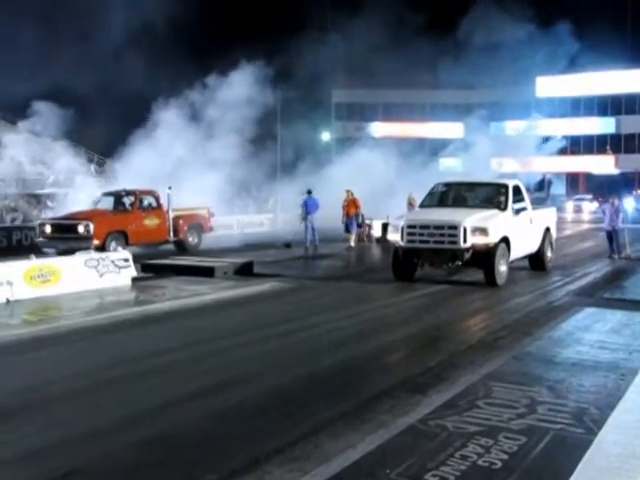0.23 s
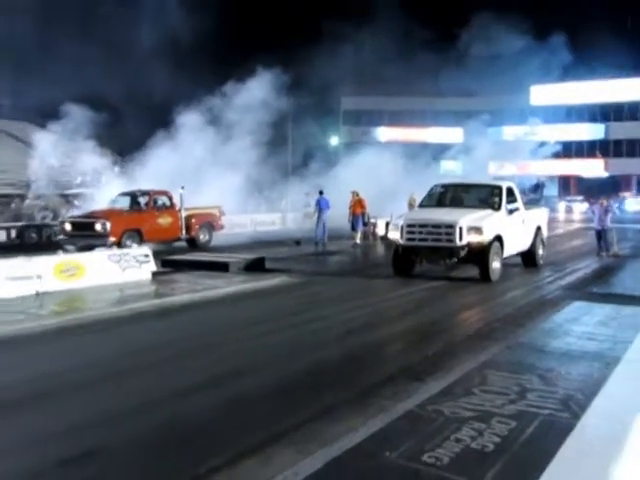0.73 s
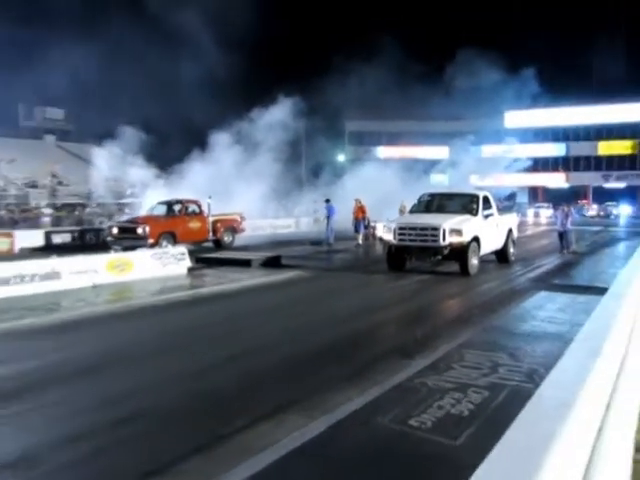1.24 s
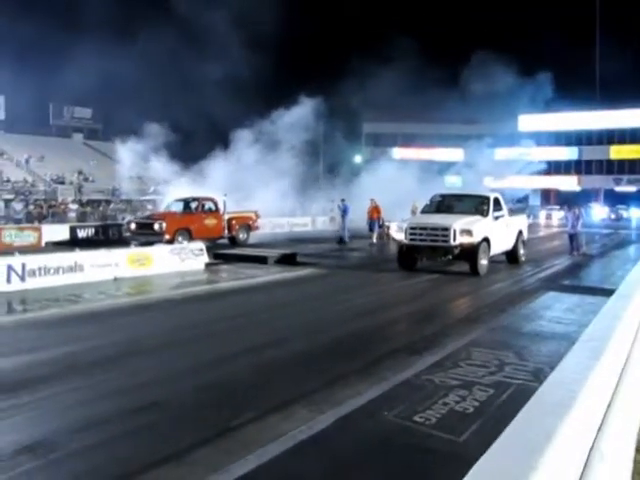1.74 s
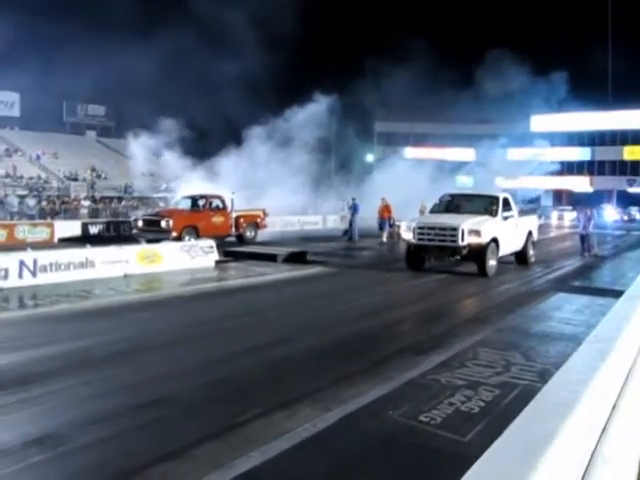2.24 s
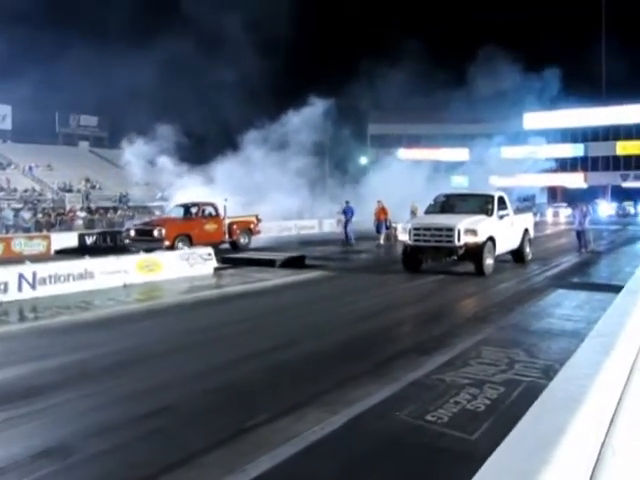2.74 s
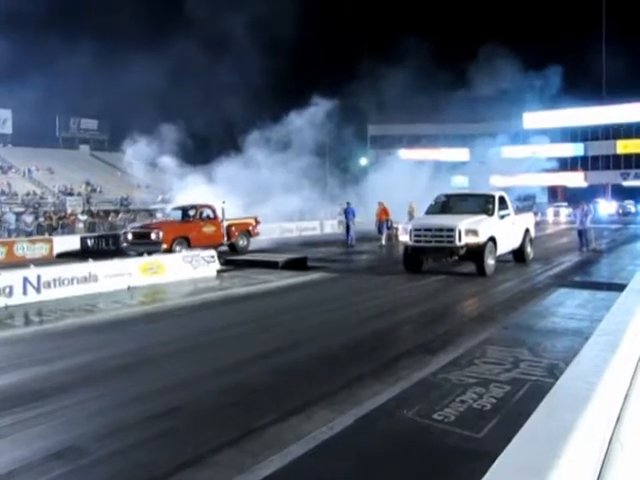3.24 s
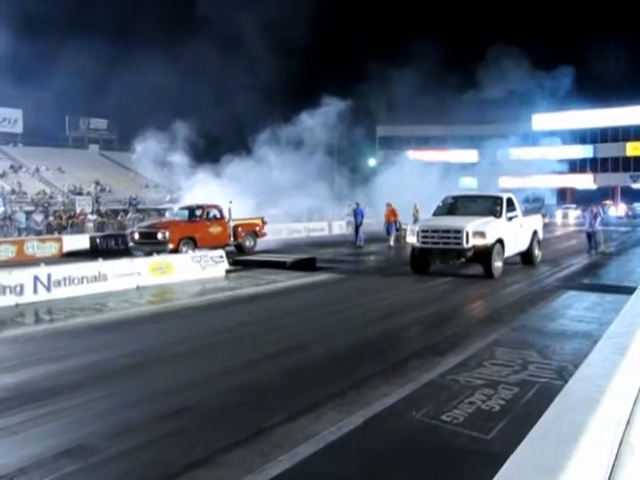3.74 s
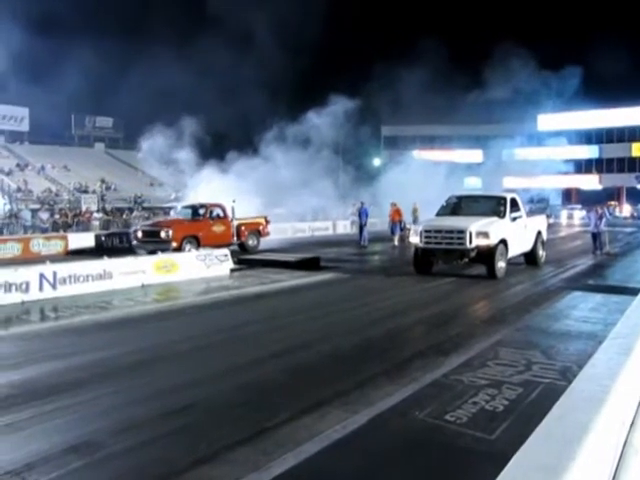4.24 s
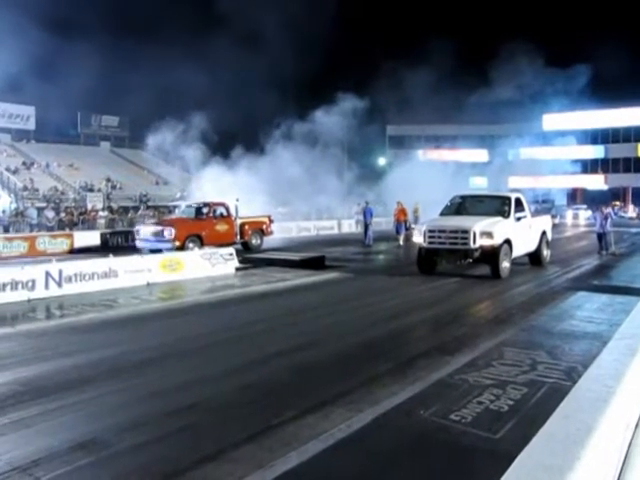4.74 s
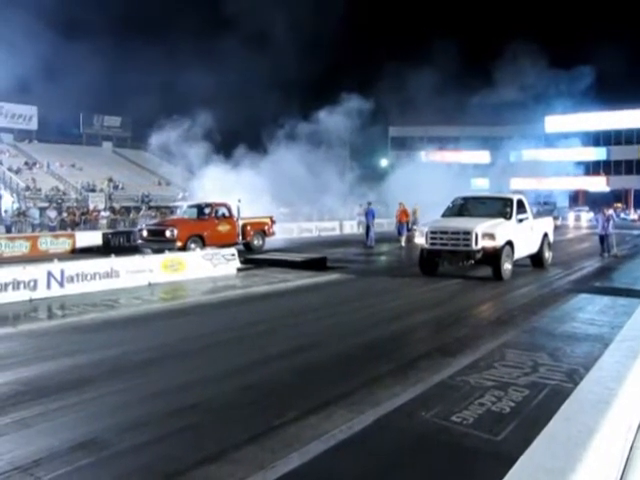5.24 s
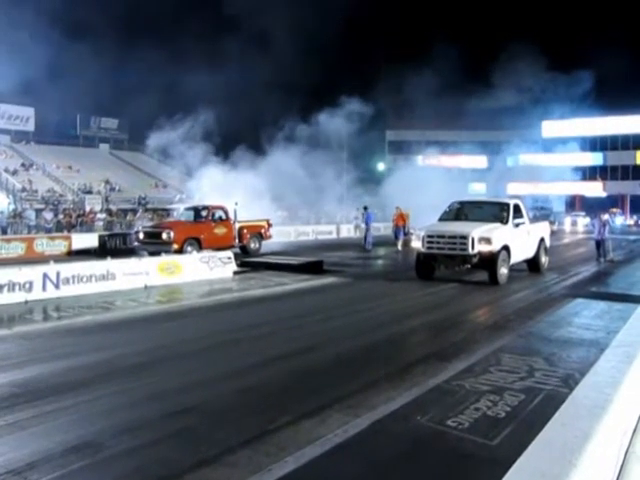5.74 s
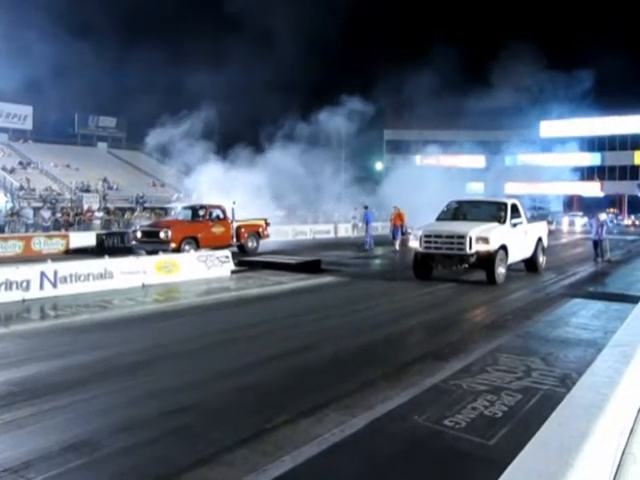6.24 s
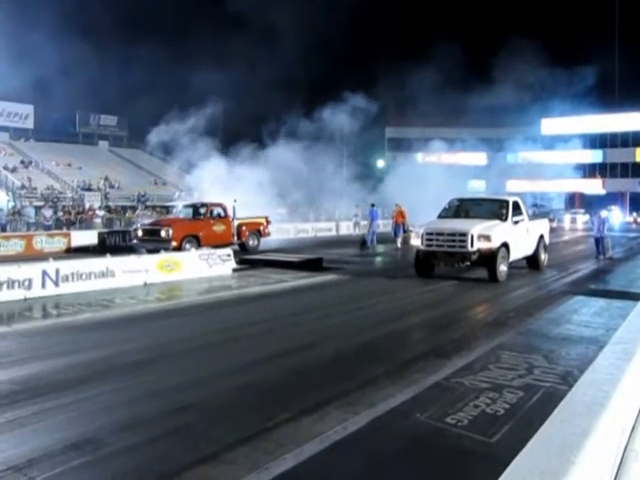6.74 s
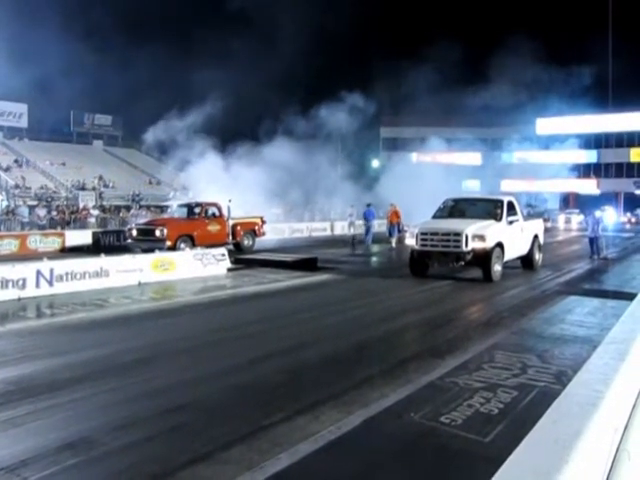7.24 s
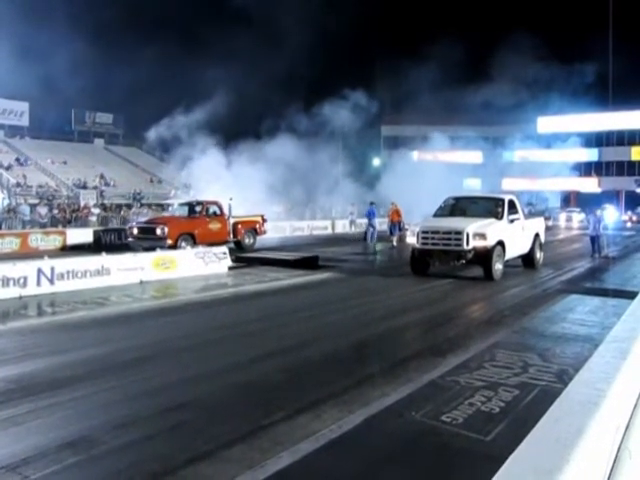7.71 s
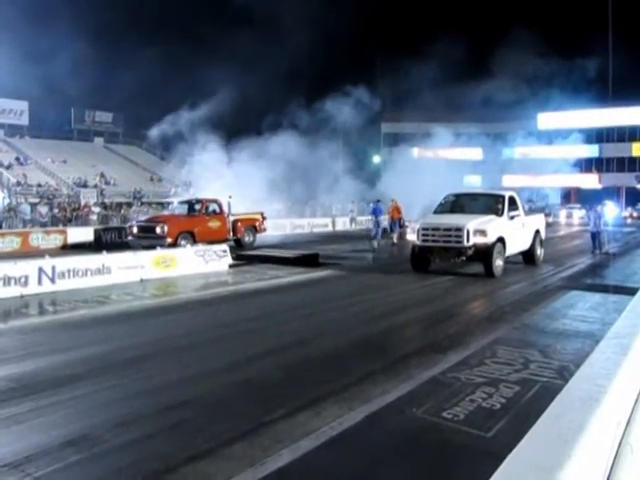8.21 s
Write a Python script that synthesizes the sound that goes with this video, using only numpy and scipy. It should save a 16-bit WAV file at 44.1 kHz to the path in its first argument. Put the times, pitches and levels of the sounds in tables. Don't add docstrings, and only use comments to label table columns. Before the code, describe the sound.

A diesel pickup idles with clattering knock and a brief brake squeal, then revs hard, exhaust droning and turbos whistling upward to the end.

```python
import sys
import numpy as np
from scipy import signal
from scipy.fft import rfft, irfft
from scipy.io import wavfile
from scipy.ndimage import uniform_filter1d

SR = 44100
rng = np.random.default_rng(int(sys.argv[2]) if len(sys.argv) > 2 else 0)


def store_wav(level_fs):
    pcm = np.round(np.clip(np.atleast_2d(level_fs), -1, 1) * 32767)
    wavfile.write(sys.argv[1], SR, pcm.T.astype(np.int16))


def field_ratio(decibels):
    return 10 ** (np.asarray(decibels, dtype=float) / 20)


N = 373527

# f/Hz, level/dB
ECHO_COLOUR = [(60, -24), (300, -24), (700, -18), (1500, -10), (3000, -7), (5000, -1), (8000, -2),
               (14000, -2)]
# f/Hz, level difference/dB
LEFT_COLOUR = [(60, 0.5), (700, 0.5), (1280, 0), (2370, -4), (4370, 2), (8070, -3.5), (14900, -2)]
# f/Hz, level/dB per Hz
RUMBLE_COLOUR = [(25, -18), (45, 3.5), (75, 12.5), (107, 13), (150, 10), (200, 9.5), (300, 4), (450, 6),
                 (700, -37)]
# t/s, f/Hz
SQUEAL_PITCH = [
    (.58, 1335),
    (.7, 1348),
    (.9, 1312),
    (1.2, 1300),
    (1.29, 1262),
    (1.45, 1265),
    (1.67, 1308),
]
# f/Hz, level/dB per Hz
HISS_COLOUR = [(1760, -11.5), (3000, -2), (4400, -11), (4940, -16.5), (5390, -10), (6000, -9.5),
               (7200, -10), (8690, -18.5), (10000, -20.5), (10800, -66), (15000, -97)]
# t/s, f/Hz
TURBO_SPEED = [
    (5.9, 2350),
    (6.3, 2700),
    (6.6, 3120),
    (6.95, 3640),
    (7.3, 4160),
    (7.7, 4640),
    (8.0, 4942),
    (8.24, 5140),
    (8.47, 5270),
]
# multiple of the engine cycle, level/dB
EXHAUST_TONES = [(5, -31), (6, -50), (8, -2), (9, -36), (10, -28), (11, -33), (12, -5.5), (13, -32.5),
                 (14, -15), (15, -15.5), (16, -6.5), (17, -12.5), (18, -8.5), (20, -20), (22, -13),
                 (24, -11.5), (26, -20.5), (28, -29), (30, -16), (32, -22.5), (34, -18), (36, -20),
                 (40, -13), (44, -30.5), (47, -19.5), (49, -28), (52, -13.5)]
# f/Hz, width/Hz, level/dB
STACK = [(127.5, 39, 0), (184.3, 2.6, 4.5), (234.1, 8.3, 11.5), (299.7, 27, 9), (344, 6.7, 4.5),
         (686, 100, 16.5)]
# f/Hz, level/dB per Hz
CLATTER_COLOUR = [(210, -35), (350, -21.5), (416, -21.5), (447, -19), (744, -7.5), (807, -6), (941, -14.5),
                  (1300, -12.5), (1440, -10.5), (2130, -10), (2330, -12.5), (2610, -8), (3130, -23.5),
                  (4000, -35.5), (5200, -28), (8800, -120)]
# f/Hz, time to fall 60 dB/s, level/dB
BLOCK_MODES = [(814.2, 0.03, -1), (1280.5, 0.051, -4), (1505, 0.024, -1.5), (1860, 0.012, 1.5),
               (2105, 0.015, 3), (2682, 0.017, 0.5), (3800, 0.0084, -8.5), (4534, 0.0051, -3),
               (5430, 0.014, -13.5), (7300, 0.012, -8.5)]
# one row per block mode, eight columns of level/dB
STRIKE = [(13, -12, -12, -9, 2, -7, -8, -3), (-1, -8, 4, 2, -8, -3, -9, -8), (3, 2, -9, -3, -3, 1, -9, -3),
          (3, 2, -3, -9, 1, 5, -3, -9), (3, -9, 6, 3, -5, -1, 6, -1), (-4, -3, -8, -3, -4, 9, 8, -5),
          (-1, -4, -9, 2, -6, -4, 11, -4), (-1, 3, 2, 5, -4, -4, -1, -6), (-3, 2, -6, 0, -6, -3, -3, -8),
          (2, 6, 0, -6, -8, 0, -3, 4)]
# t/s, firing rate/Hz
CRANK_SPEED = [(0, 45.35), (1, 44.87), (2, 44.85), (3, 45.18), (4, 45.05), (4.7, 45.57), (5.3, 41.76),
               (5.55, 44.45), (5.7, 55.6), (5.85, 60.5), (6, 74.5), (6.3, 94.88), (6.5, 102.23),
               (6.75, 108.21), (7.3, 115.61), (7.9, 122.08), (8.47, 123.96)]
# t/s, share of full load (0-1)
FUEL = [
    (0, 0.03),
    (5.1, 0),
    (5.55, .18),
    (5.8, 0.43),
    (6.0, 0.68),
    (6.25, .9),
    (6.5, 1.06),
    (6.8, 1.0),
    (8.47, 0.99),
]

# start t/s, attack/s, hold/s, release/s, level before/dB, level held/dB, level after/dB
BLADE_SWELL = (6.3, .5, 1.05, .3, -55, -36.5, -29.5)
SHAFT_SWELL = (6.3, .6, .9, .5, -60, -30, -34)
SECOND_STAGE_SWELL = (5.9, 1.0, .9, .35, -50, -36.5, -50)
SQUEAL_SWELL = (-1.1, 0.9, -2.8, 6.3, -36.5, -20, -28.5)
HUM_SWELL = (0, .1, 3, .6, -45, -45, -51)
CONVERTER_SWELL = (5.85, .13, .37, .2, -60, -28, -80)
RUSH_HZ, RUSH_SWELL = 5350, (5.25, .65, 1.0, .4, -46, -32, -46)
DRONE_HZ, DRONE_SWELL = 805, (5.55, .4, 1.75, .75, -45, -19.5, -28)

# idle level/dB, rise at full load/dB
CLATTER_DB, KNOCK_DB, TONE_DB = (-14.5, 9), (-4.5, -0.5), (-40.5, 14)
HISS_DB, RUMBLE_DB, SIZZLE_DB = (-35, 11.5), (-31.5, 3), (-64.5, 6.5)
TONE_BOOST_DB, HISS_BOOST_DB, SIZZLE_BOOST_DB = 4.5, 5, 7.5
TONE_LAG = 1.1
SIZZLE_CREEP_DB_PER_S = 1.64
FIRST_FIRING = -6.15
BLADES, SECOND_STAGE = 6, 1.6
SHAFT_ON_STACK = (662, 50, 10)
CONVERTER_HZ, CONVERTER_GLIDE_HZ_PER_S = 1130, 200
HUM_HZ = 420
TICK_HZ, TICK_DULL_DB = 3000, 9
ECHO_WANDER_S = .0006
LEFT_LAG_S, MIC_LOW_CUT_HZ = 5e-5, 48


def rms_one(x):
    return x / np.sqrt(np.mean(x ** 2) + 1e-20)


def in_time(rows):
    s, *columns = np.transpose(rows)
    return [np.interp(np.arange(N) / SR, s, c) for c in columns]


def swell(shape):
    start, attack, hold, release, before_db, held_db, after_db = shape
    corners = np.cumsum([start, attack, hold, release])
    return np.interp(np.arange(N) / SR, corners, [before_db, held_db, held_db, after_db])


def follow(level_db, share):
    return level_db[0] + level_db[1] * share


def colour(x, points, lag_s=0):
    hz = np.fft.rfftfreq(N, 1 / SR) + 1e-3
    point_hz, point_db = np.transpose(points)
    gain = field_ratio(np.interp(np.log(hz), np.log(point_hz + 1), point_db))
    delay = np.exp(-2j * np.pi * hz * lag_s)
    return irfft(rfft(x) * gain * delay, N)


def drift(rate):
    r = np.exp(-80 * np.pi * rate / SR)
    slow = signal.lfilter([1], [1, -2 * r, r * r], rng.standard_normal(N // 40 + 2002))[2000:]
    return np.interp(np.arange(N) / 40, np.arange(len(slow)), rms_one(slow))


def ring(clicks, hz, t60):
    r, w = field_ratio(-60 / (t60 * SR)), 2 * np.pi * hz / SR
    return signal.lfilter([0, np.sin(w)], [1, -2 * r * np.cos(w), r * r], clicks + 1e-18)


def whistle(hz, db, wobble_hz, flutter_db):
    phase = 2 * np.pi * np.cumsum(hz + wobble_hz * drift(30)) / SR
    return np.sqrt(2) * field_ratio(db + flutter_db * drift(15)) * np.sin(phase)


def narrow_noise(hz, db, width):
    low_pass = signal.butter(2, width, fs=SR, output="sos")
    band = signal.sosfilt(low_pass, rng.standard_normal(N))
    return field_ratio(db) * rms_one(band * np.sin(2 * np.pi * np.cumsum(hz) / SR))


def echoes(x):
    s = np.arange(int(.4 * SR)) / SR
    tails = rng.standard_normal((2, len(s))) * field_ratio(-60 * s / .35) * (s > .002)
    tails /= np.sqrt(np.sum(tails ** 2, axis=1, keepdims=True))
    scattered, at = colour(x, ECHO_COLOUR), np.arange(N)
    ports = []
    for tail in tails:
        wander = ECHO_WANDER_S * SR * uniform_filter1d(drift(2), SR // 50)
        echo = signal.fftconvolve(scattered, tail)[:N]
        ports.append(np.interp(at + wander, at, echo))
    return np.array(ports)


def generator_hum():
    return whistle(np.full(N, HUM_HZ), swell(HUM_SWELL), wobble_hz=1.5, flutter_db=2.5)


def distant_rumble(fuel):
    noise = rms_one(colour(rng.standard_normal(N), RUMBLE_COLOUR))
    return field_ratio(follow(RUMBLE_DB, fuel) + 1.4 * drift(7.0)) * noise


def brake_squeal():
    hz, = in_time(SQUEAL_PITCH)
    s = np.arange(N) / SR
    edge_s = np.minimum(s - SQUEAL_PITCH[0][0], SQUEAL_PITCH[-1][0] - s)
    creeping = np.clip(edge_s / 0.032, 0, 1)
    return creeping * whistle(hz, swell(SQUEAL_SWELL) - 5, wobble_hz=4, flutter_db=2.0)


def converter():
    since_s = (np.arange(N) / SR - CONVERTER_SWELL[0]).clip(0)
    hz = CONVERTER_HZ + CONVERTER_GLIDE_HZ_PER_S * since_s
    return whistle(hz, swell(CONVERTER_SWELL), wobble_hz=8, flutter_db=2.0)


def sizzle(fuel, boost):
    band_pass = signal.butter(4, [9500, 14300], "band", fs=SR, output="sos")
    band = signal.sosfilt(band_pass, rng.standard_normal(N))
    creep_db = SIZZLE_CREEP_DB_PER_S * np.arange(N) / SR
    db = follow(SIZZLE_DB, fuel) + SIZZLE_BOOST_DB * boost + creep_db
    return field_ratio(db + 4 * drift(12)) * rms_one(band)


def intake_hiss(firings, fuel, boost):
    puff = 1 + .5 * np.exp(-3.5 * (firings % 1))
    hiss = colour(rng.standard_normal(N) * puff * field_ratio(2.1 * drift(60)), HISS_COLOUR)
    return field_ratio(follow(HISS_DB, fuel) + HISS_BOOST_DB * boost + 2.0) * rms_one(hiss)


def intake_rush():
    return narrow_noise(np.full(N, RUSH_HZ), swell(RUSH_SWELL), width=240)


def stack_drone():
    return narrow_noise(np.full(N, DRONE_HZ), swell(DRONE_SWELL), width=45)


def turbo(hz):
    mid_hz, width, lift_db = SHAFT_ON_STACK
    shaft_hz = hz / BLADES
    shaft_db = swell(SHAFT_SWELL) + lift_db / (1 + (2 * (shaft_hz - mid_hz) / width) ** 2)
    blade = whistle(hz, swell(BLADE_SWELL) + 5, wobble_hz=6, flutter_db=2.5)
    shaft = whistle(shaft_hz, shaft_db, wobble_hz=5.2, flutter_db=3.0)
    second = narrow_noise(hz * SECOND_STAGE, swell(SECOND_STAGE_SWELL) + 7, width=160)
    return blade + shaft + second


def exhaust(firings, per_s, fuel, boost):
    out, at = np.zeros(N), np.arange(N)
    for order, db in EXHAUST_TONES:
        hz = order * per_s[::64] / 8
        lift = 1
        for mid_hz, width, top_db in STACK:
            lift = lift + field_ratio(top_db) / (1 + (2 * (hz - mid_hz) / width) ** 2)
        lift = np.interp(at, at[::64], lift)
        waver = .015 * order * drift(4)
        tone = np.sin(2 * np.pi * order * firings / 8 + order ** 2 + waver)
        out += lift * field_ratio(db + 1.2 * drift(3)) * tone
    return field_ratio(follow(TONE_DB, fuel.clip(0) ** TONE_LAG) + TONE_BOOST_DB * boost) * out


def clatter(firings, gate):
    pulse = 1 + gate * np.exp(-3.0 * (firings % 1))
    return rms_one(colour(rng.standard_normal(N) * pulse * field_ratio(1.0 * drift(30)), CLATTER_COLOUR))


def knocks(firings, fuel, jitter_s, spread_db, rough):
    at = np.flatnonzero(np.diff(np.floor(firings))) + 1
    cylinder = np.floor(firings[at]).astype(int) % 8
    chance = rng.standard_normal((len(at), 1 + len(BLOCK_MODES)))
    at = np.clip(at + (jitter_s * SR * chance[:, 0]).astype(int), 0, N - 1)
    speed_up = np.gradient(firings) * SR / 45
    uneven = np.sqrt(1 / speed_up[at])
    rattle = rng.standard_normal(N)
    out = np.zeros(N)
    for k, ((hz, t60, db), by_cylinder) in enumerate(zip(BLOCK_MODES, STRIKE)):
        dull_db = TICK_DULL_DB * fuel[at] * (hz > TICK_HZ)
        strike_db = 0.91 * uneven * np.array(by_cylinder)[cylinder]
        clicks = np.zeros(N)
        clicks[at] = field_ratio(db - dull_db + strike_db + spread_db * chance[:, k + 1])
        burn = signal.lfilter([.1], [1, -.994], clicks) * rattle
        out += ring(ring(clicks + rough * burn, hz, t60), hz, t60) / (t60 * SR / 40)
    return rms_one(out * np.sqrt(1 / speed_up))


def engine_block(firings, fuel):
    knock = knocks(firings, fuel, jitter_s=.00012, spread_db=1.0, rough=.25)
    block = clatter(firings, gate=0.1) + field_ratio(follow(KNOCK_DB, fuel)) * knock
    return field_ratio(follow(CLATTER_DB, fuel) - 6.5) * block


def scene():
    per_s, = in_time(CRANK_SPEED)
    firings = FIRST_FIRING + np.cumsum(per_s) / SR
    fuel, = in_time(FUEL)
    blade_hz = uniform_filter1d(in_time(TURBO_SPEED)[0], SR // 10)
    boost = ((blade_hz - blade_hz[0]) / (blade_hz[-1] - blade_hz[0])) ** 2
    air = generator_hum() + distant_rumble(fuel) + brake_squeal() + converter()
    air += sizzle(fuel, boost) + intake_hiss(firings, fuel, boost) + intake_rush()
    air += stack_drone() + exhaust(firings, per_s, fuel, boost) + engine_block(firings, fuel)
    direct = air + turbo(blade_hz)
    left = colour(direct, [(hz, db / 2) for hz, db in LEFT_COLOUR], LEFT_LAG_S)
    right = colour(direct, [(hz, -db / 2) for hz, db in LEFT_COLOUR])
    return np.array([left, right]) + echoes(air)


def band_limit(x):
    return signal.sosfilt(signal.butter(12, 15500, fs=SR, output="sos"), x)


def record(dry):
    low_cut = signal.butter(2, MIC_LOW_CUT_HZ, "high", fs=SR, output="sos")
    thin = signal.sosfilt(low_cut, dry)
    mix = np.clip(thin, -1, 1)
    return band_limit(mix)


dry = scene()
out = record(dry)
store_wav(out)
```